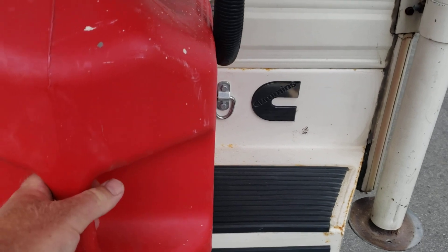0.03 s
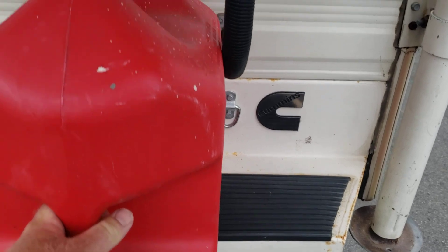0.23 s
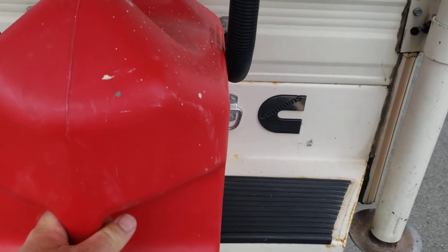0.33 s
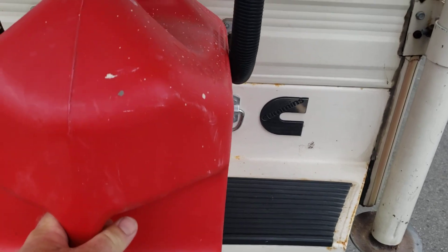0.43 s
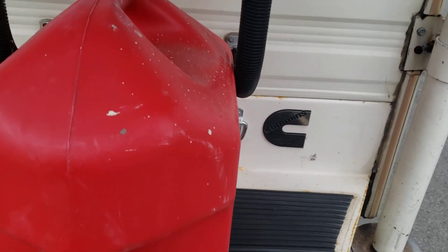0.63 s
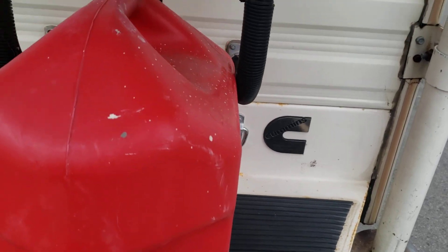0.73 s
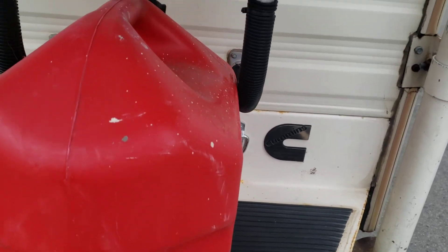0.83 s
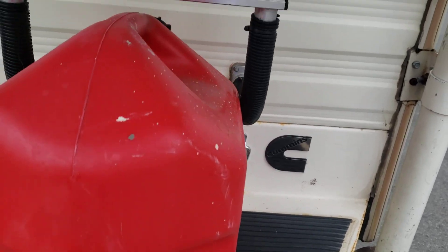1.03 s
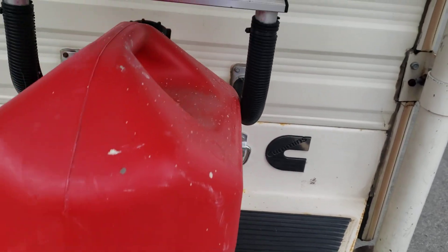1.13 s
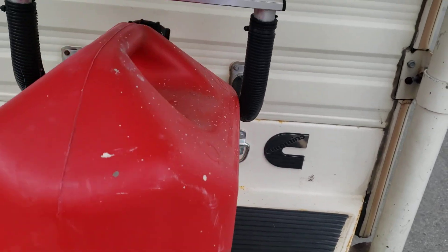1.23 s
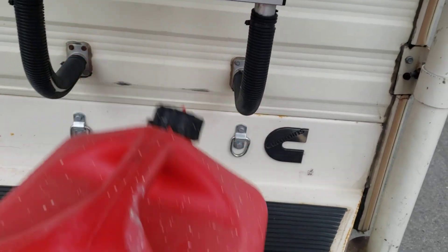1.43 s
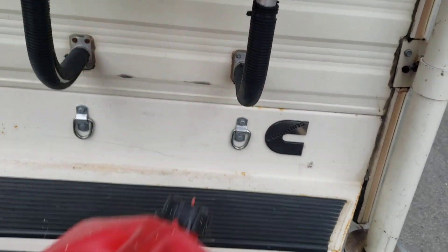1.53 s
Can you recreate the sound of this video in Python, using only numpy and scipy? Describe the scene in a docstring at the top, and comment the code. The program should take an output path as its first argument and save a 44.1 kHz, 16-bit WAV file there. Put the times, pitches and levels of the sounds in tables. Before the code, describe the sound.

Hollow drumming and raspy scraping of a large plastic can being dragged, ending with a hard knock

```python
"""Outdoor air and low handling rumble lie under a big hollow plastic can dragged off a metal ladder and strap.
Strokes of stick and slip drum its shell and rasp its surface; dirt ticks, the strap hisses, the wall flexes.
A faint high squeak glides up, then the can catches in a quick cluster of sharp contacts and rings briefly.
Random slips and coloured noise excite resonances; decaying sines make the flexes and the knock's ring."""
import sys
import numpy as np
from scipy import signal
from scipy.fft import rfft, irfft, next_fast_len
from scipy.io import wavfile
from scipy.ndimage import uniform_filter1d, map_coordinates

SR = 44100
rng = np.random.default_rng(int(sys.argv[2]) if len(sys.argv) > 2 else 0)


def waveform_to_disk(signal):
    """Save audio, clipped to [-1, 1], as 16-bit WAV at the path in sys.argv[1]."""
    frames = np.transpose(np.atleast_2d(signal))
    scaled = np.clip(frames, -1, 1) * 32767
    samples = np.round(scaled).astype(np.int16)
    wavfile.write(sys.argv[1], SR, samples)


N = 70560
T = np.arange(N) / SR  # time in s


def amp(db):
    """Level: 20 dB is a tenfold amplitude."""
    return 10 ** (np.asarray(db) / 20)


def unit(x):
    """Root mean square: scale a signal to rms 1."""
    return x / np.sqrt(np.mean(x ** 2) + 1e-20)


def along(points, hz):
    """Logarithmic pitch scale: interpolate (frequency_hz, value) points along it."""
    point_hz, value = np.transpose(points)
    return np.interp(np.log(hz + 1), np.log(point_hz + 1), value)


def curves(rows):
    """Slow modulation: one value per sample for each column after the time."""
    time_s, *columns = np.transpose(rows)
    return [np.interp(T, time_s, column) for column in columns]


def wobble(per_s):
    """Band-limited fluctuation: a smooth curve of rms 1 through per_s random points a second."""
    return unit(map_coordinates(rng.standard_normal(N // 10), [T * per_s]))


def filtered(x, response):
    """Linear filtering: multiply the spectrum by a response of frequency."""
    size = next_fast_len(N + SR // 2)
    spectrum = rfft(x, size) * response(np.fft.rfftfreq(size, 1 / SR))
    return irfft(spectrum, size)[..., :N]


def resonances(modes, f):
    """Resonance: the powers of independent modes add; each peaks at its own frequency."""
    power = 0
    for centre, width, db in modes:
        mode = amp(db) * f * width / (centre ** 2 - f ** 2 + 1j * f * width)
        power = power + np.abs(mode) ** 2
    return np.sqrt(power)


def stereo(pair, response):
    """Interaural coherence: mix two unrelated signals to left and right, alike in the bass; mid has rms 1."""
    # left-right likeness: frequency_hz, correlation
    likeness = [(100, 0.97), (300, 0.98), (600, 0.85), (1500, 0.28), (5000, 0.083), (13000, 0.091)]

    def mid_side(hz):
        turn = np.arccos(np.clip(along(likeness, hz), -1, 1)) / 2
        return response(hz) * np.array([np.cos(turn), np.sin(turn)])

    mid, side = filtered(pair, mid_side)
    return np.array([mid + side, mid - side]) / np.std(mid)


def noise(colour):
    """Spectral shaping: white noise takes a colour of frequency_hz, density_db_per_hz."""
    return stereo(rng.standard_normal((2, N)), lambda hz: amp(along(colour, hz)))


def slips(per_s, scatter_db):
    """Stick-slip: two trains of impulses at random moments, sizes scattered up to twice scatter_db."""
    size_db = scatter_db * np.clip(rng.standard_normal((2, N)), -2, 2)
    happens = rng.random((2, N)) < per_s / SR
    return happens * np.sign(rng.standard_normal((2, N))) * amp(size_db)


def steadied(x, size):
    """Short-time power: even out chance swells longer than size samples."""
    power = uniform_filter1d(np.mean(x ** 2, 0), size)
    return x / np.sqrt(np.abs(power) + 1e-9)


def strike(start_s, t60_s, attack_s):
    """Free decay: a quick rise, then an exponential fall of 60 dB in t60_s."""
    t = np.maximum(T - start_s, 0)
    return amp(-60 * t / t60_s) * (1 - np.exp(-t / attack_s))


def background():
    """Broadband noise: outdoor air holds steady while the low rumble of handling swells and sinks."""
    # colour of the air: frequency_hz, density_db_per_hz
    air_colour = [(25, -26), (60, -5.5), (110, 8.5), (200, -9), (300, -8.5), (450, -36), (800, -13),
                  (1300, -26.5), (2500, -18), (3600, -38), (5800, -37.5), (9000, -47), (12500, -44),
                  (15500, -45)]
    # rumble of handling: time_s, level_db
    rumble_course = [(0, -51), (.08, -54), (.17, -63), (.3, -60), (.42, -57), (.58, -51), (.85, -46.5),
                     (.93, -50), (1.04, -42.5), (1.14, -50.5), (1.27, -52), (1.37, -43), (1.48, -58),
                     (1.6, -53.5)]
    # colour of the rumble: frequency_hz, density_db_per_hz
    rumble_colour = [(10, -50), (20, -28), (30, -16), (42, -5), (57, 0), (76, -9), (97, -9), (140, -25),
                     (300, -60), (600, -120)]
    rumble_db, = curves(rumble_course)
    air = amp(-54) * noise(air_colour)
    rumble = amp(rumble_db) * steadied(noise(rumble_colour), size=3000)
    return air + rumble


def walls(x):
    """Reverberation: nearby panels answer with a short noise tail whose treble dies sooner."""
    # decay of the tail: frequency_hz, t60_s
    tail_decay = [(150, 0.61), (2000, 0.11), (12000, 0.08)]
    hz, t, bins = signal.stft(rng.standard_normal((2, SR // 2)), SR, nperseg=256)
    decay = amp(-60 * t / along(tail_decay, hz)[:, None])
    tail = signal.istft(bins * decay, SR, nperseg=256)[1]
    return signal.fftconvolve(x, tail / np.linalg.norm(tail[0]), axes=1)[:, :N]


def slide():
    """Sliding friction: smooth plastic on the strap's webbing gives a thin, airy hiss."""
    # light sliding along the strap: time_s, level_db
    slide_course = [(0, -72), (.14, -72), (.2, -63), (.24, -55), (.3, -55), (.37, -86), (.5, -87),
                    (.58, -57), (.68, -84), (.78, -63), (.87, -75), (.91, -70), (.96, -78), (1.05, -74),
                    (1.15, -61), (1.3, -69), (1.36, -63), (1.43, -93)]
    # colour of the hiss: frequency_hz, density_db_per_hz
    hiss_colour = [(2000, -25), (5500, -5), (7500, -20), (9200, -24), (12300, 0), (15500, 0)]
    level_db, = curves(slide_course)
    return amp(level_db) * noise(hiss_colour)


def squeak():
    """Frequency modulation: the rubbing wall's faint whistle glides upward with a random waver."""
    # path of the squeak: time_s, pitch_hz before the waver, level_db
    glide = [(.915, 11400, -85), (.928, 11800, -66), (.965, 13300, -70), (1.0, 13250, -73),
             (1.035, 13100, -70), (1.06, 14200, -70), (1.085, 15500, -77)]
    pitch_hz, level_db = curves(glide)
    waver_hz = 70 * unit(uniform_filter1d(rng.standard_normal(N), size=60))
    sounding = (T > glide[0][0]) * (T < glide[-1][0])
    phase = 2 * np.pi * np.cumsum(pitch_hz + waver_hz) / SR
    return amp(level_db) * sounding * np.sin(phase)


def flexes():
    """Modal ringing: the wall flexes and lets go, so one low mode swells and rings out."""
    # releases of the wall: start_s, level_db, pitch_hz, t60_s
    releases = [(.272, -31, 140, .2), (.55, -24, 172, .22), (.57, -33, 304, .2), (.82, -32, 140, .25),
                (.955, -27, 140, .15), (1.388, -23, 304, .135)]
    out = np.zeros(N)
    for start, db, hz, t60 in releases:
        out += amp(db) * strike(start, t60, attack_s=.012) * np.sin(2 * np.pi * hz * (T - start))
    return out


def ticks():
    """Impulsive fracture: grains of dirt snap under the wall as short bright bursts of noise."""
    # snaps of grains: start_s, level_db before the overall trim
    snaps = [(0.0695, -53.5), (.1466, -48), (0.202, -45), (0.229, -28.5), (0.289, -37), (0.5396, -48),
             (.5716, -32.5), (.916, -51), (1.5618, -64.5)]
    # colour of a snap: frequency_hz, density_db_per_hz
    snap_colour = [(500, -6), (1800, 2), (3500, -3), (5600, 2), (8500, -8), (12500, 1), (15500, 1)]
    trim_db, t60_s = -3.5, .021
    envelope = sum(amp(db + trim_db) * strike(start, t60_s, attack_s=.0003) for start, db in snaps)
    return noise(snap_colour) * envelope


def knock():
    """Impact: each contact in a quick stutter gives a noise crack and rings the corner's modes."""
    # sharp contacts with the ladder: start_s, level_db relative to the ring and crack levels
    contacts = [(1.3213, -10), (1.338, -8), (1.3409, -3.5), (1.3416, 3), (1.3453, -7), (1.3481, -8),
                (1.355, -12.5), (1.389, -26.5)]
    # stiff corner against the rung: pitch_hz, mean relative level_db, t60_s
    corner_modes = [(583, -7, 0.063), (690, -16.5, 0.15), (1087, -25, 0.19), (1250, -28, .07),
                    (1413, 1, 0.05), (1645, 3.5, 0.041), (1780, 0.5, 0.034), (1940, -4.5, 0.036),
                    (2187, -3, 0.047), (2810, -15, 0.046), (2791, -19, 0.04), (3013, -30, 0.032),
                    (3300, -6, 0.04)]
    # colour of the crack: frequency_hz, density_db_per_hz
    crack_colour = [(300, 2), (1500, -1), (3000, -1), (4200, -7.5), (6000, -4.5), (7500, -19.5),
                    (9000, -24.5), (12000, -10.5), (15000, -12.5)]
    ring_db, crack_db, crack_t60_s = -28, -28, .033
    left_lead_s = .00003
    ear_time = T + left_lead_s * np.array([[.5], [-.5]])
    out = np.zeros((2, N))
    for start, db in contacts:
        ring = np.zeros((2, N))
        for hz, mode_db, t60 in corner_modes:
            gain = amp(mode_db + rng.normal(0, 1.8))
            ear_phase = rng.normal(0, .82, (2, 1))  # radians, apart for left and right
            phase = 2 * np.pi * (hz * ear_time + rng.random()) + ear_phase
            ring += gain * strike(start, t60, attack_s=.00054) * np.sin(phase)
        crack = strike(start, crack_t60_s, attack_s=.00033) * noise(crack_colour)
        out += amp(db) * (amp(ring_db) * ring + amp(crack_db) * crack)
    return out


def rubbing():
    """Stick-slip excitation: coarse slips drum the shell; fine ones rasp, rouse the ribs and grind grit."""
    # rubbing pressure: time_s, drum_level_db and rasp_level_db before the trims of the layers
    strokes = [(0, -59.5, -65), (.07, -54, -73), (.16, -60.5, -67.5), (.195, -43, -52), (.22, -44.5, -53),
               (.28, -31, -43.5), (.335, -38.5, -51), (.375, -45.5, -61.5), (.425, -52, -67),
               (.46, -38, -55), (.51, -36, -47.5), (.58, -26.5, -40.5), (.65, -31.5, -46),
               (.73, -43, -46.5), (.765, -36.5, -44.5), (.8, -37.5, -48), (.85, -35.5, -48.5),
               (.93, -44, -56.5), (.965, -34.5, -51), (1.01, -45, -59), (1.075, -44, -54.5),
               (1.17, -34.5, -48.5), (1.22, -37, -50.5), (1.29, -44, -53.5), (1.33, -31, -41.5),
               (1.37, -33.5, -46), (1.398, -35, -45), (1.425, -45, -60.5), (1.47, -54.5, -70),
               (1.55, -62.5, -93), (1.6, -61, -58)]
    # hollow shell: pitch_hz, width_hz, peak_db before the treble roll-off
    shell_modes = [(97, 16, -4), (116, 14, -5), (140, 13, 0), (173, 13, -1), (207, 22, -7), (236, 20, -10),
                   (281, 14, -12), (305, 14, -4), (342, 30, -10), (410, 24, -14), (465, 26, -12.5),
                   (558, 15, -11)]
    # higher resonances of the ribbed wall: pitch_hz, width_hz, peak_db before the treble roll-off
    rib_modes = [(715, 30, -4), (980, 30, -2), (1081, 22, 0), (1140, 26, 0), (1415, 40, -3), (1622, 45, -3),
                 (2110, 60, -6)]
    # colour of the surface rasp: frequency_hz, density_db_per_hz before the low cut
    rasp_colour = [(300, -11), (520, -8), (750, -4), (1100, -1), (1500, -3), (1900, -4), (2900, -7),
                   (3900, -12.5), (5700, -13.5), (7300, -27), (9000, -37), (11000, -30), (12500, -25),
                   (15500, -25)]
    # colour of the grit: frequency_hz, density_db_per_hz
    grit_colour = [(3000, -25), (5500, -10), (8500, -15), (12500, 0), (15500, 0)]
    drum_trim_db, rasp_trim_db, ribs_trim_db, grit_trim_db = -.5, -1.14, -4, -14.5
    low_cut_hz = 400
    grit_growth = 1.8  # dB of grit per dB of rasp
    drum_db, rasp_db = curves(strokes)

    def shell(f):
        return resonances(shell_modes, f) / (1 + (f / 900) ** 4)

    def surface(f):
        return amp(along(rasp_colour, f)) * f ** 2 / (f ** 2 + low_cut_hz ** 2)

    def ribbing(f):
        return resonances(rib_modes, f) / (1 + (f / 3500) ** 4)

    def fine_slips():
        return grip * slips(per_s=2400, scatter_db=2)

    drum = steadied(stereo(slips(per_s=1000, scatter_db=3.5), shell), size=800)
    grip = amp(1.5 * wobble(per_s=120))  # uneven grip, 1.5 dB rms
    rasp = stereo(fine_slips(), surface)
    ribs = stereo(fine_slips(), ribbing)
    grit = stereo(grip * slips(per_s=2500, scatter_db=7), lambda f: amp(along(grit_colour, f)))
    # grit rises faster with pressure than the rasp
    grit_db = rasp_db.max() + grit_growth * (rasp_db - rasp_db.max())

    out = amp(drum_db + drum_trim_db) * drum
    out += amp(rasp_db) * (amp(rasp_trim_db) * rasp + amp(ribs_trim_db) * ribs)
    out += amp(grit_db + grit_trim_db) * grit
    return out


def scene():
    """Superposition: sources, echo of the hits and background add; lows lean left, treble right."""
    # lean of the stereo image: frequency_hz, left_over_right_db
    balance = [(60, 1.5), (250, 2.2), (600, 1.2), (1400, 1.6), (2400, 3.2), (4500, -2.6), (14000, -3.5)]
    hits = knock() + ticks()
    echo = amp(-17) * walls(hits)
    mix = background() + echo + slide() + squeak() + flexes() + hits + rubbing()
    return filtered(mix, lambda hz: amp(along(balance, hz) * np.array([[.5], [-.5]])))


def record(dry):
    """Saturation and band limiting: round off the highest peaks, then keep nothing above the top."""
    ceiling, top_hz = .2, 15780  # ceiling as a share of full scale
    rounded = dry / (1 + (dry / ceiling) ** 4) ** (1 / 4)
    return filtered(rounded, lambda hz: hz < top_hz)


dry = scene()
out = record(dry)
waveform_to_disk(out)
```